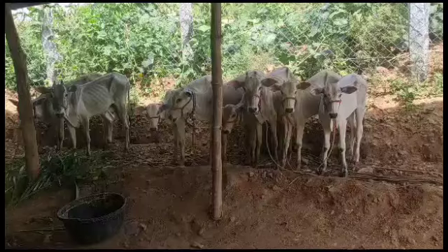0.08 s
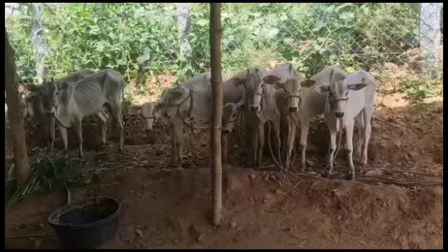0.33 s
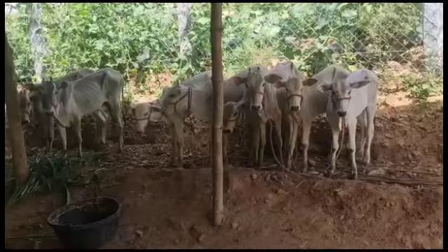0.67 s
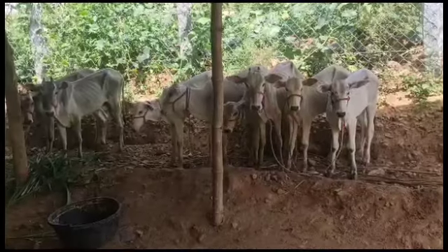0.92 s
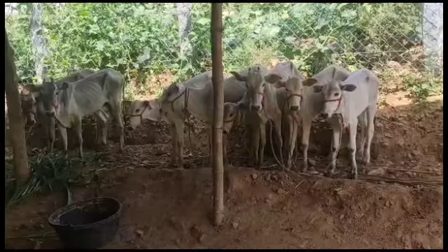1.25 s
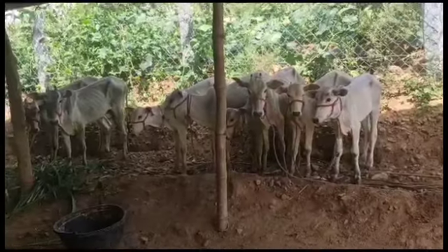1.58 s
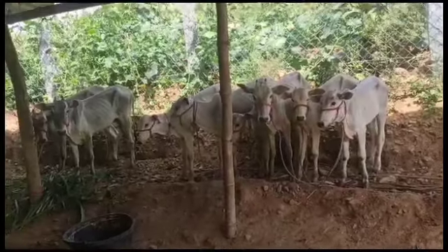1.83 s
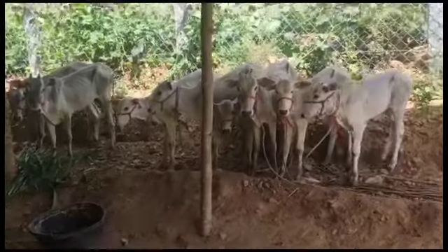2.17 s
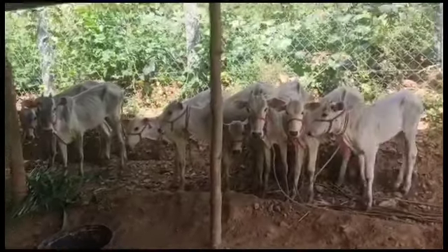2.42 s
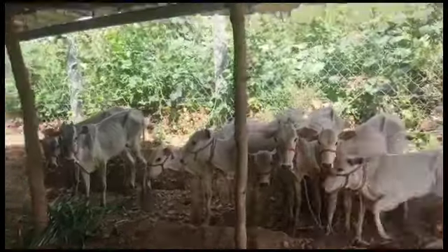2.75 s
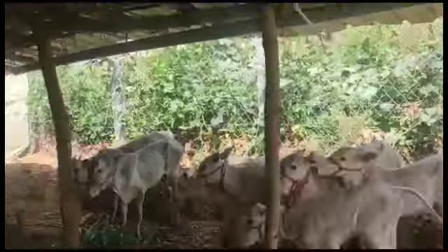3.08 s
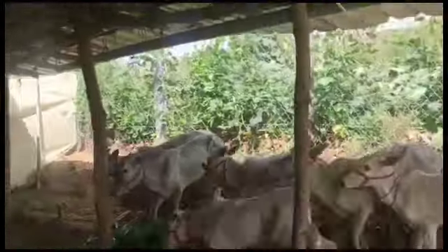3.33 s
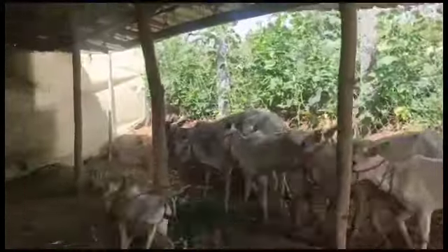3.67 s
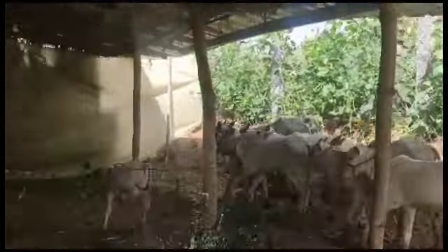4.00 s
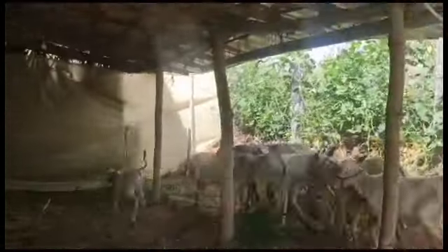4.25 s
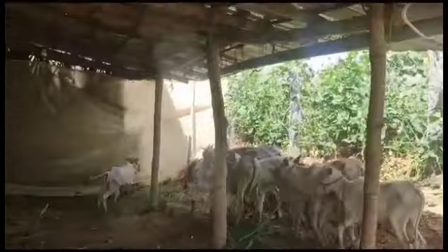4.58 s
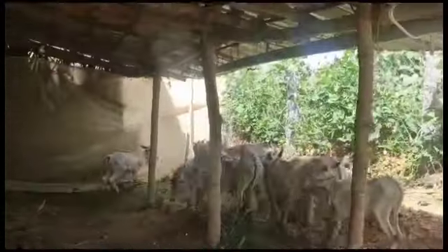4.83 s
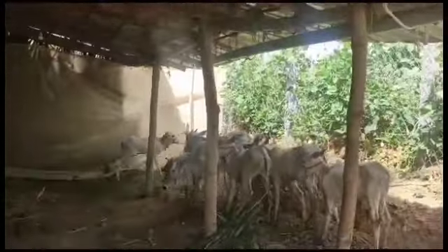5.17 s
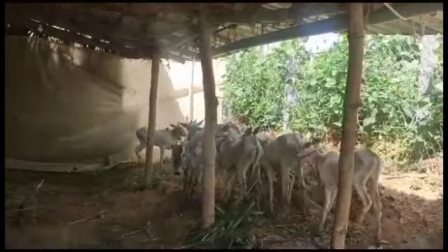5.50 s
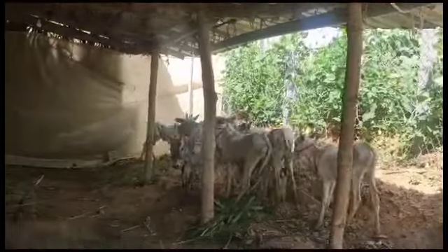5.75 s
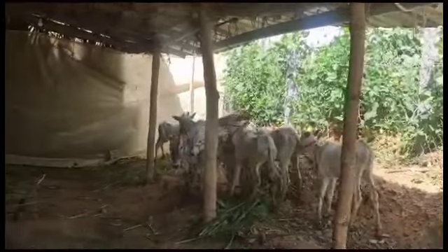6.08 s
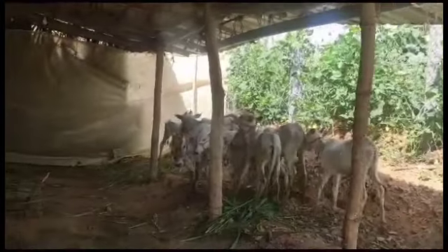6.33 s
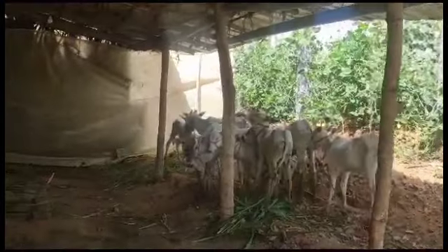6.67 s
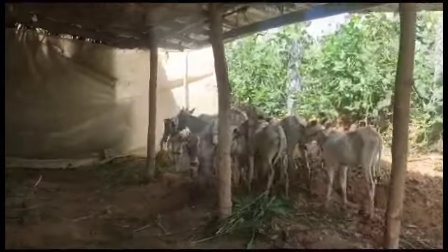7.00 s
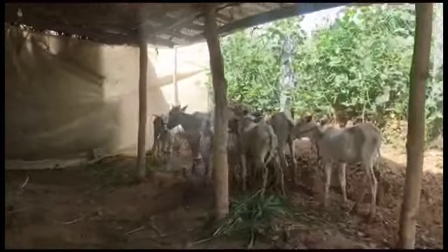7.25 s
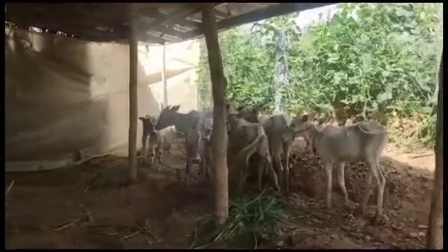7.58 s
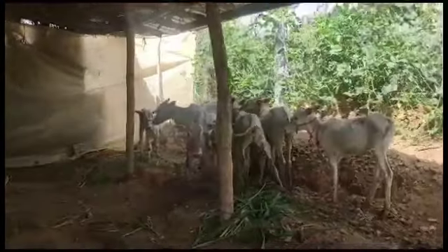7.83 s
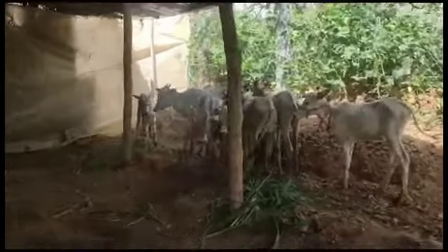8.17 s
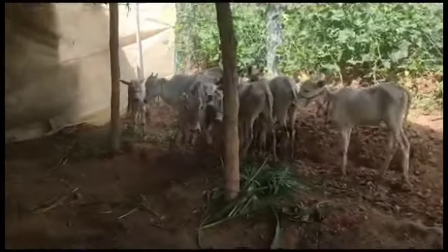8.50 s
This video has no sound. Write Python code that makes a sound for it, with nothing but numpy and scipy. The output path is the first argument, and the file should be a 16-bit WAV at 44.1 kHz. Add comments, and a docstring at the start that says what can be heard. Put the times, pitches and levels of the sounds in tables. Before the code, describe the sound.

Calves scuffle over dry soil and straw, one kicks a plastic tub with a hollow boom, water splashes, and shuffling follows.

```python
"""Calves kick a water tub

Calves bolt across dry soil and straw under an open shed, crunching grit and snapping sticks.
One kicks a plastic tub: its walls crack and boom, and water slops out and rains on the soil.
The herd then shuffles and stamps while puffs of air buffet the two ports of a hand-held microphone."""
import sys
import numpy as np
from scipy import signal
from scipy.fft import rfft, irfft, next_fast_len
from scipy.io import wavfile
from scipy.ndimage import uniform_filter1d

SR = 44100
rng = np.random.default_rng(int(sys.argv[2]) if len(sys.argv) > 2 else 0)


def store_wav(level_fs):
    """Save 16-bit WAV to argv[1]."""
    pcm = np.round(np.clip(np.atleast_2d(level_fs), -1, 1) * 32767)
    wavfile.write(sys.argv[1], SR, pcm.T.astype(np.int16))


N = 375732
TIME = np.arange(N) / SR
SHED_T60_S, PORT_LAG_S = 0.34, 0.0005

# Hits on the tub. Each row: start in seconds, boom in dB, crack in dB, place from wall (0) to rim (1).
TUB_HITS = [(3.4972, -23, -16.5, 0.6), (3.5054, -13, -17, 0.53), (3.5144, -8.5, -31.5, 0),
            (3.5526, -30, -16, 0), (3.571, -18.5, -35, 0.11), (3.598, -26, -19, 0.74),
            (3.6651, -15, -25, 0.87), (3.671, -16.5, -9.5, .6), (3.6795, -9, -10.5, 0.91),
            (3.708, -16, -16, 0.64), (3.722, -17.5, -24, 0.86), (3.741, -23.5, -16.5, 0.57)]
# The tub's ring. Each row: pitch in Hz, dB when hit on the wall, dB when hit on the rim, T60 in seconds.
TUB_MODES = [(154, -23, -4, 0.25), (184.5, -45.5, -11, 0.71), (221.5, -29, -2.5, 0.15),
             (253.8, -14.5, -9.5, 0.26), (317, -7.5, -18.5, 0.39), (320.6, 7.5, -10, 0.053),
             (361.4, -18.5, -7.5, 0.19), (413, -21, -12.5, 0.25), (440, -35, -21, 0.52),
             (500, -38.5, -8, 0.4), (530, -19, -2, 0.13), (600, -24, 4.5, 0.025), (628.3, -39, -9.5, 0.31),
             (668, -13, -16, 0.14), (767, -26, -8, 0.16), (853, -11.5, -11, 0.1), (1047, -29, -26, .13),
             (1153, -26, -13.5, 0.22), (1462, -36, -11, 0.14), (1775, -25, -20.5, 0.23)]
# The crack of plastic. Each row: frequency in Hz, relative level in dB.
CRACK_EQ = [(100, 4.5), (200, 0), (600, 10), (1100, 5.5), (1600, -12), (2400, -34), (4000, -22),
            (9000, -17), (15000, -18)]

def tub():
    """A hoof dents the wall, then the tub tips and rocks; every hit cracks and rings the same modes."""
    starts, boom_db, crack_db, place = np.transpose(TUB_HITS)
    at = np.round(starts * SR).astype(int)
    boom = 0
    for k, (hz, wall_db, rim_db, t60) in enumerate(TUB_MODES):
        mode_db = wall_db + place * (rim_db - wall_db)
        clicks = np.zeros(N)
        clicks[at] = from_db(boom_db + mode_db + rng.normal(0, 1, len(at)))
        polarity = (-1) ** ((k + 1) // 2)
        boom = boom + polarity * ring(clicks, hz, t60)
    # Water sloshing against the soft walls makes their pitches waver.
    boom = np.interp(TIME + 0.00025 * drift(per_s=35), TIME, boom)
    lag_s = PORT_LAG_S / 4
    boom = at_ports(boom, lag_s) + from_db(-15) * shed_echoes(boom)
    force = blows(starts, crack_db, np.full(len(starts), 0.06), rise_share=0.031)
    return boom + in_shed(force, noise(CRACK_EQ), CRACK_EQ, wet_db=2.5, lag_s=lag_s)


# Plastic on grit. Each row: frequency in Hz, relative level in dB.
SCRAPE_EQ = [(600, 1), (1100, 5), (1700, -6), (2300, -8), (2750, -4), (3300, -16), (6000, -22)]

def scrape():
    """The bottom edge of the tub grinds briefly over grit just before it tips."""
    skid = swell(3.654, db=-24.5, length_s=0.02)
    return crackle(skid, SCRAPE_EQ, per_s=1500, spread_db=3, clump_db=1, wet_db=3)


# Slops of water. Each row: start in seconds, hold in seconds, splat in dB, spray in dB.
SPLASHES = [(3.502, 0.0085, -26, -54), (3.532, .004, -27.5, -49), (3.55, 0.012, -28.5, -38),
            (3.598, 0.013, -28, -52), (3.634, .022, -25.5, -37.5), (3.669, 0.033, -20.5, -22),
            (3.716, 0.011, -31, -32), (4.3, 0.054, -37.5, -37)]
# Heavy drops on soil. Each row: frequency in Hz, relative level in dB.
SPLAT_EQ = [(200, 0.5), (500, -2), (900, 0.5), (1400, 2), (2300, 3.5), (3300, -2.5), (5000, -5.5),
            (7000, -9.5)]

def spill():
    """Water slops out as the tub jolts, then rains down: heavy drops splat first, fine spray follows."""
    from_s, until_s = 3.84, 4.412
    patter = gush(from_s, until_s, attack_s=0.11, release_db_per_s=73)
    elapsed = np.clip(TIME - from_s, 0, until_s - from_s)
    heavy = patter * from_db(-33.5 - 8.5 * elapsed)
    fine = patter * from_db(-36.5 + 4.5 * elapsed)
    for start, hold_s, splat_db, spray_db in SPLASHES:
        splash = gush(start, start + hold_s, attack_s=0.0046, release_db_per_s=596)
        heavy = np.hypot(heavy, from_db(splat_db) * splash)
        fine = np.hypot(fine, from_db(spray_db) * splash)
    splat = crackle(heavy, SPLAT_EQ, per_s=720, spread_db=-1, clump_db=3.5, wet_db=14)
    spray = crackle(fine, HISS_EQ, per_s=2500, spread_db=6, clump_db=2, wet_db=7)
    return splat + spray


# Steps and scuffs. Each row: start in seconds, crunch, straw and thud in relative dB, T60 in seconds,
# resonance underfoot in Hz.
STEPS = [(2.045, -61.5, -70, -62, 0.21, 800), (2.21, -58.5, -68, -62, 0.5, 2250),
         (2.54, -51, -37.5, -53, 0.11, 3310), (2.678, -37.5, -40, -40.5, 0.075, 2700),
         (2.712, -48, -38, -46, 0.072, 3500), (2.837, -44, -45, -41.5, 0.07, 2400),
         (2.933, -45, -49, -45, 0.18, 704), (3.06, -41.5, -39.5, -42, .08, 2300),
         (3.283, -36.5, -46, -37, 0.094, 2850), (3.982, -30, -31, -56, 0.067, 4500),
         (4.008, -31, -52, -29, 0.1, 510), (4.14, -37, -45, -34.5, 0.26, 2020),
         (4.338, -33.5, -47, -53, 0.23, 3480), (4.671, -39, -38, -58, 0.12, 2156),
         (4.865, -32, -30, -43, 0.27, 950), (4.915, -51, -58, -41, 0.35, 940),
         (5.224, -33.5, -41.5, -37.5, 0.22, 1300), (5.335, -39.5, -47, -53, 0.15, 1790),
         (5.81, -50, -54, -65, 0.24, 2200), (5.99, -45, -44, -67, 0.13, 2200),
         (6.049, -43, -38, -65, 0.18, 3000), (6.08, -43, -53, -46, 0.17, 560),
         (6.209, -34.5, -48, -36, 0.16, 1090), (6.24, -47.5, -49, -57, 0.39, 1100),
         (6.487, -45, -60.5, -53, 0.086, 2120), (6.665, -42.5, -50, -48.5, 0.14, 1490),
         (6.932, -54, -77, -48, 0.19, 600), (7.07, -48.5, -63, -50.5, 0.69, 900),
         (7.214, -42.5, -44.5, -49, 0.084, 4800), (7.342, -38.5, -45, -57, 0.068, 1030),
         (7.423, -35, -45, -55, 0.061, 3000), (7.753, -33, -36, -42, 0.084, 2070),
         (7.875, -55, -43, -66, 0.15, 4000), (7.921, -36, -37, -41, 0.064, 5500),
         (8.451, -45.5, -53, -45.5, 0.2, 1850)]
# The crunch of grit and the thud of earth. Each row: frequency in Hz, relative level in dB.
CRUNCH_EQ = [(500, -2.5), (800, 1.5), (1100, 0.5), (1700, -2), (2130, 2.5), (2450, -3), (3100, -7.5),
             (4200, -10), (6500, -15)]
THUD_EQ = [(140, 0.5), (200, 1), (330, -8), (500, -0.5), (650, -2.5), (1000, -8)]

def hooves():
    """Each hoof crunches and thuds; the clod, twig or stone under it resonates until the next step."""
    starts, crunch_db, _, thud_db, t60, underfoot_hz = np.transpose(STEPS)
    crush = blows(starts, crunch_db, t60, rise_share=0.089)
    crunch = from_db(-2) * crackle(crush, CRUNCH_EQ, per_s=470, spread_db=9, clump_db=-0.5, wet_db=10.5)
    weight = blows(starts, thud_db, t60, rise_share=0.0054)
    thud = in_shed(weight, noise(THUD_EQ), THUD_EQ, wet_db=31)
    edges = [int((start - 0.005) * SR) for start in starts] + [N]
    underfoot = np.zeros((2, N))
    for first, last, hz in zip(edges, edges[1:], underfoot_hz):
        underfoot[:, first:last] = resonate(crunch[:, first:last], hz, q=3.7)
    return crunch + 0.99 * underfoot + thud


# Bare, packed ground. Each row: frequency in Hz, relative level in dB.
STAMP_EQ = [(120, -41), (200, -13), (378, -10.5), (610, -2.5), (1030, -9.5), (1140, -7), (2110, -5),
            (3630, -11), (3990, -12.5), (4760, -18.5), (9000, -34), (11700, -61), (19800, -120)]

def stamp():
    """One hoof slaps packed earth: a dense, dull crack with no straw in it."""
    force = blows(starts=[8.312], levels_db=[-23.5], t60s=[0.1], rise_share=0.053)
    return in_shed(force, grains(STAMP_EQ, per_s=7200, spread_db=6), STAMP_EQ, wet_db=22)


# The herd's bustle before and after the kick. Each row: time in seconds, relative level in dB.
BUSTLE_BEFORE = [(1.85, -74.5), (2.916, -54), (3.194, -52), (3.46, -41)]
BUSTLE_AFTER = [(4.5, -48), (4.79, -45.5), (5.61, -54.5), (6.21, -56.5), (6.33, -56.5), (6.94, -59.5),
                (7.32, -51.5), (8.34, -60), (8.5, -55.5)]
# A leg or tether sweeps the straw. Each row: peak time in seconds, level in dB, length in seconds.
SWEEPS = [(0.42, -64, 0.15), (0.572, -57.5, 0.036), (0.765, -59.5, 0.1), (2.056, -62.5, 0.091),
          (2.25, -58, 0.084), (2.63, -44, 0.097), (2.705, -38, 0.063), (2.907, -44, 0.4),
          (2.964, -39.5, 0.071), (3.258, -35, 0.16), (4.221, -30, 0.1), (6.053, -47, 0.26),
          (7.136, -48, 0.12), (7.545, -43, 0.17), (7.985, -49, 0.23), (8.435, -46.5, 0.018),
          (8.468, -48, 0.018)]
# Dry soil, and the hiss of straw or spray. Each row: frequency in Hz, relative level in dB.
SOIL_EQ = [(150, 12.5), (300, -3.5), (520, 2.5), (800, 0), (1300, 0), (2200, 0), (3200, -6.5), (4500, -11),
           (7000, -15)]
HISS_EQ = [(2500, 1), (4000, -1), (6000, -1.5), (9000, 0), (11000, -2.5), (13000, -6), (16000, -9)]

def litter():
    """Dragging legs stir soil and straw; sweeps and steps swish through it and break dry stalks."""
    bustle = from_db(in_time(np.vstack([BUSTLE_BEFORE, BUSTLE_AFTER]))[0])
    sweeps = np.sqrt(sum(swell(*row) ** 2 for row in SWEEPS))
    starts, _, straw_db, _, t60, _ = np.transpose(STEPS)
    steps = blows(starts, straw_db + 2.5, t60, rise_share=0.11)
    dragging = np.hypot(from_db(2) * bustle, from_db(-11) * sweeps)
    stirring = np.sqrt((from_db(4.5) * bustle) ** 2 + sweeps ** 2 + steps ** 2)
    soil = crackle(dragging, SOIL_EQ, per_s=400, spread_db=6, clump_db=2, wet_db=9)
    straw = crackle(stirring, HISS_EQ, per_s=1400, spread_db=7, clump_db=2.5, wet_db=7.5)
    snaps = from_db(-17.5) * stirring * stalks(per_s=70, spread_db=3.5)
    return soil + straw + at_ports(snaps, PORT_LAG_S)


def stalks(per_s, spread_db, count=12):
    """Dry stalks break now and then, each ringing briefly at one of several pitches; rms 1."""
    pings = 0
    for hz in np.geomspace(1900, 11000, count):
        breaks = random_clicks(per_s / count, spread_db)
        pings = pings + rms_one(ring(breaks, hz, t60=45 / hz))
    return rms_one(pings)


# Dry sticks under a hoof. Each row: start in seconds, level in dB, pitch in Hz, T60 in seconds.
STICK_BREAKS = [(2.682, -34.5, 2700, 0.13), (2.845, -43, 2370, .08), (3.214, -47, 2500, .06),
                (3.285, -35, 3070, .09), (4.871, -30, 2210, 0.26), (4.975, -42, 2110, 0.32),
                (5.203, -43, 2080, 0.088), (5.238, -38, 2070, .15), (5.336, -40, 1900, 0.14),
                (5.812, -46, 2250, 0.16), (6.213, -47, 2040, .09), (6.491, -44, 2090, 0.12),
                (7.346, -39, 2200, .06), (7.425, -36.5, 1850, 0.066), (7.761, -33, 2130, 0.079)]

def sticks():
    """A stick snaps with one woody ping; its splintering holds the same pitch a little longer."""
    out, age = np.zeros((2, N)), TIME[:SR // 3]
    for start, db, hz, t60 in STICK_BREAKS:
        splinters = rms_one(resonate(rng.standard_normal((2, len(age))), hz, q=10.5))
        snap = from_db(-7 - 60 * age / 0.035) * np.sin(2 * np.pi * hz * age)
        at = int(start * SR)
        out[:, at:at + len(age)] += from_db(db) * (snap + from_db(-60 * age / t60) * splinters)
    return out


# Tiny close ticks. Each row: start in seconds, relative level in dB, left over right in dB.
TICK_HITS = [(0.6117, -38, 29.5), (0.657, -21.5, -10), (1.072, -43, 12.5), (1.1746, -24, -6.5),
             (1.227, -44, 6), (2.8964, -24, 8), (2.922, -16.5, 14)]
# Their ring. Each row: pitch in Hz, relative level in dB, T60 in seconds.
TICK_RING = [(3570, -27, 0.0052), (7200, -20.5, 0.0025), (9900, 0, 0.00084)]

def ticks():
    """Bright dry clicks ring for a few milliseconds at most, each nearer one port."""
    clicks = np.zeros((2, N))
    for start, db, pan_db in TICK_HITS:
        clicks[:, round(start * SR)] = from_db(db + np.array([pan_db, -pan_db]) / 2)
    ringing = sum(from_db(db) * ring(clicks, hz, t60) for hz, db, t60 in TICK_RING)
    return signal.sosfilt(signal.butter(1, 2000, "high", fs=SR, output="sos"), ringing)


# Air past the moving microphone. Each row: time in seconds, relative level in dB, left over right in dB.
AIRFLOW = [(1.7, -72, 1), (2.4, -49.5, -2), (3.35, -42, 5), (4.2, -49.5, -2), (4.7, -43, 0),
           (5.55, -36, -12), (6.35, -41, -10), (6.65, -49, -5), (8.5, -62, -10)]
# Puffs of air. Each row: peak time in seconds, buffet and flutter in relative dB, length in seconds,
# left over right in dB.
PUFFS = [(.5, -77, -62.5, .45, 0), (1.97, -44, -62, 0.02, 6), (2.767, -43.5, -68, 0.069, -15),
         (3.508, -38, -40, 0.021, 5), (3.677, -26.5, -46, 0.032, 1), (4.733, -32.5, -36, 0.038, -6),
         (4.974, -17.5, -20, 0.028, -23), (5.043, -31, -17, 0.029, -16), (5.09, -25, -29, 0.03, -25),
         (5.149, -31, -23, 0.023, -36), (5.255, -33, -32.5, 0.07, -13), (5.318, -31.5, -41, 0.045, -5),
         (5.623, -40, -41, 0.025, -14), (5.693, -31.5, -31.5, 0.016, -20), (5.764, -27, -41, 0.035, -14),
         (5.825, -37, -34.5, 0.049, -23), (5.889, -26.5, -33.5, 0.028, -24), (5.922, -32, -34, 0.012, -22),
         (6.116, -24, -25.5, 0.022, -21), (6.178, -26.5, -32.5, 0.047, -20),
         (6.28, -36.5, -38.5, 0.047, -18), (6.456, -36.5, -44.5, 0.075, -36),
         (6.505, -32, -39.5, 0.055, -26), (6.91, -39.5, -43.5, 0.036, -46), (7.129, -38.5, -39, 0.019, -6),
         (7.215, -39, -47, 0.055, -11)]
# Deep buffeting and fast flutter. Each row: frequency in Hz, relative level in dB.
BUFFET_EQ = [(18, 15.5), (35, 11.5), (55, 5), (80, -1.5), (120, -20), (180, -62), (280, -41), (500, -59)]
FLUTTER_EQ = [(50, 2), (110, 0), (200, -12.5), (400, -37)]

def wind():
    """Separate puffs ride on a breeze; each port gets its own lumpy eddies and faster flutter."""
    breeze_db, breeze_pan_db = in_time(AIRFLOW)
    buffet_power = from_db(breeze_db) ** 2 * port_shares(breeze_pan_db)
    flutter_power = buffet_power * from_db(-18.5) ** 2
    for peak_s, buffet_db, flutter_db, length_s, pan_db in PUFFS:
        puff = swell(peak_s, 0, length_s) ** 2 * port_shares(pan_db)
        buffet_power += from_db(buffet_db) ** 2 * puff
        flutter_power += from_db(flutter_db) ** 2 * puff
    rumble = evened(noise(BUFFET_EQ, (2, N)), window_s=0.077)
    eddies = np.tanh(0.41 * rumble) / 0.28
    flutter = evened(noise(FLUTTER_EQ, (2, N)), window_s=0.04) * from_db(3 * drift(per_s=45))
    return from_db(4.5) * np.sqrt(buffet_power) * eddies + np.sqrt(flutter_power) * flutter


# The outdoor bed. Each row: frequency in Hz, relative level in dB.
AIR_EQ = [(20, 1), (48, -6.5), (70, -13), (90, -18.5), (133, -26), (300, -30), (570, -34), (750, -37.5),
          (1400, -44), (2300, -41), (4500, -49.5), (9000, -47), (15500, -48.5)]

def open_air():
    """A faint, steady rumble and hiss from all around, a little louder on the left."""
    return from_db(-54) * diffuse(AIR_EQ) * from_db([[1.5], [-1.5]])


# Stereo width of diffuse sound. Each row: frequency in Hz, left-right correlation from 0 to 1.
PORT_LIKENESS = [(30, 0.78), (120, 1), (250, 1), (500, 0.99), (1000, 0.2), (2000, 0.003)]

def diffuse(eq):
    """Noise from all around: alike at both ports in the bass, unrelated in the treble; rms 1."""
    shape = eq_gains(eq)
    mid, side = shape * rng.standard_normal((2, 2 * len(shape))).view(complex)
    alike = at_hz(PORT_LIKENESS, np.linspace(0, SR / 2, len(shape)))
    spectrum = np.sqrt(1 + alike) * mid + np.sqrt(1 - alike) * side * [[1], [-1]]
    return rms_one(irfft(spectrum)[:, :N])


def in_shed(force, texture, eq, wet_db, lag_s=PORT_LAG_S):
    """A texture plays under a force envelope; roof and wall return a smooth, diffuse wash."""
    keep = from_db(-2 * 60 / (SHED_T60_S * SR))
    tail_power = signal.lfilter([1 - keep], [1, -keep], force ** 2 + 1e-18)
    wash = np.sqrt(0.5 * force ** 2 + 0.5 * tail_power) * diffuse(eq)
    wet = from_db(wet_db)
    return (at_ports(force * texture, lag_s) + wet * wash) / np.hypot(1, wet)


def shed_echoes(x, first_echo_s=0.014):
    """Dense, dying reflections from roof and wall, different at each port."""
    age = TIME[:SR // 2]
    tail = rng.standard_normal((2, len(age))) * from_db(-60 * age / SHED_T60_S) * (age > first_echo_s)
    return signal.fftconvolve(x[None], rms_one(tail) / np.sqrt(len(age)), axes=1)[:, :N]


def ground_echo(x, share, delay_s):
    """A bounce off the ground colours the sound; its path wanders as the animals move."""
    bounce = [np.interp(TIME - delay_s * from_db(2 * drift(per_s=3)), TIME, port) for port in x]
    return (x + share * np.array(bounce)) / np.hypot(1, share)


def at_ports(x, lag_s):
    """Mono to stereo, reaching the left port a little late."""
    return np.array([np.interp(TIME - lag_s, TIME, x), x])


def port_shares(pan_db):
    """Split power between the two ports; positive is left."""
    return 1 / (1 + from_db(2 * pan_db * np.array([[-1], [1]])))


def crackle(force, eq, per_s, spread_db, clump_db, wet_db):
    """Grains that come in clumps, heard in the shed."""
    clumps = from_db(clump_db * drift(per_s=60))
    return in_shed(force * clumps, grains(eq, per_s, spread_db), eq, wet_db)


def grains(eq, per_s, spread_db):
    """Small snaps of uneven size, per_s a second in each of four bands; rms 1."""
    edges = np.geomspace(eq[0][0] / 2, min(eq[-1][0] * 1.2, SR * 0.45), 5)
    bands = [signal.butter(2, pair, "band", fs=SR, output="sos") for pair in zip(edges, edges[1:])]
    snaps = sum(signal.sosfilt(band, random_clicks(per_s, spread_db) + 1e-18) for band in bands)
    return tint(snaps, eq)


def random_clicks(per_s, spread_db):
    """Clicks at random moments, of either sign and uneven size; rms 1."""
    chance, clicks = rng.random(N) * SR / per_s, np.zeros(N)
    at = np.flatnonzero(chance < 1)
    clicks[at] = from_db(spread_db * np.minimum(-np.log(chance[at]), 4)) * (-1.0) ** at
    return rms_one(clicks)


def blows(starts, levels_db, t60s, rise_share):
    """Envelope of blows: short ones strike sharply, long scuffs swell more slowly; their powers add."""
    power = np.zeros(N)
    for start, db, t60 in zip(starts, levels_db, t60s):
        rise_s = rise_share * t60
        at = int((start - rise_s / 4) * SR)
        age = TIME[:min(SR // 2, N - at)]
        attack = np.minimum(age / rise_s, 1)
        decay = from_db(db - 60 * np.maximum(age - rise_s, 0) / t60)
        power[at:at + len(age)] += (attack * decay) ** 2
    return np.sqrt(power)


def swell(peak_s, db, length_s):
    """A bell-shaped envelope, at half power or more for length_s."""
    return from_db(db) * np.exp(-2 * np.log(2) * np.minimum(((TIME - peak_s) / length_s) ** 2, 20))


def gush(from_s, until_s, attack_s, release_db_per_s):
    """An envelope that reaches full flow at from_s, holds and dies away."""
    attack = np.clip(1 + (TIME - from_s) / attack_s, 0, 1)
    return attack * from_db(-np.clip(release_db_per_s * (TIME - until_s), 0, 200))


def ring(clicks, hz, t60):
    """A unit click sets a sine of height 1 ringing."""
    r, w = from_db(-60 / (t60 * SR)), 2 * np.pi * hz / SR
    return signal.lfilter([0, np.sin(w)], [1, -2 * r * np.cos(w), r * r], clicks + 1e-18)


def resonate(x, hz, q):
    """Pass one resonant band."""
    return signal.lfilter(*signal.iirpeak(hz, q, fs=SR), x)


def noise(eq, shape=N):
    """Coloured noise; rms 1."""
    return tint(rng.standard_normal(shape), eq)


def tint(x, eq):
    """Colour a signal with an EQ curve; rms 1."""
    return rms_one(irfft(rfft(x, next_fast_len(N, True)) * eq_gains(eq))[..., :N])


def eq_gains(eq):
    """An EQ curve as gains on the FFT grid, rolling off beyond its ends."""
    hz = np.linspace(1e-3, SR / 2, next_fast_len(N, True) // 2 + 1)
    rolloff = 1 / (1 + (eq[0][0] / hz) ** 4) / (1 + (hz / eq[-1][0]) ** 16)
    return from_db(at_hz(eq, hz)) * np.sqrt(rolloff)


def evened(x, window_s):
    """Level out the strength of noise over window_s."""
    return x / np.sqrt(uniform_filter1d(x ** 2, int(window_s * SR)) + 1e-6)


def drift(per_s):
    """A random wander of about unit size, turning per_s times a second."""
    knots = rng.standard_normal(4096)
    return np.interp(TIME * per_s, np.arange(len(knots)), knots)


def in_time(rows):
    """The columns of a time curve at every sample."""
    times, *columns = np.transpose(rows)
    return [np.interp(TIME, times, column) for column in columns]


def at_hz(rows, hz):
    """Read a table on a log-frequency axis."""
    freqs, values = np.transpose(rows)
    return np.interp(np.log(np.maximum(hz, 1)), np.log(freqs), values)


def from_db(db):
    """Decibels to gain."""
    return 10 ** (np.asarray(db) / 20)


def rms_one(x):
    """Scale to unit power."""
    return x / np.sqrt(np.mean(x ** 2) + 1e-20)


def scene():
    """The herd is louder on the left, the tub near the centre; wind and open air surround them."""
    ground = litter() + hooves() + sticks() + stamp() + scrape() + spill()
    ground = ground_echo(ground, share=0.19, delay_s=0.0033) * from_db([[1.8], [-1.8]])
    return ground + open_air() + tub() * from_db([[0.4], [-0.4]]) + ticks() + wind()


def record(dry):
    """The sound opens after a moment and dips once, briefly; peaks stop at full scale, the top is cut."""
    fade_in = np.clip((TIME - 0.19) / 0.015, 0, 1)
    dip = np.interp(TIME, [1.857, 1.86, 1.877, 1.881], [1, 0.05, 0.05, 1])
    lowpass = signal.ellip(12, 0.1, 90, 15700, fs=SR, output="sos")
    return signal.sosfilt(lowpass, np.clip(dry * fade_in * dip, -1, 1))


dry = scene()
out = record(dry)
store_wav(out)
```